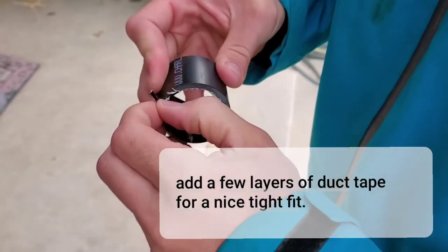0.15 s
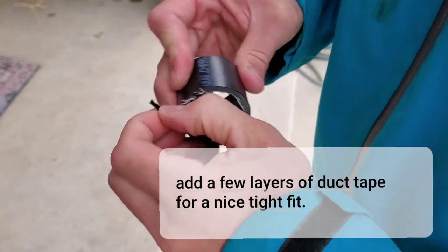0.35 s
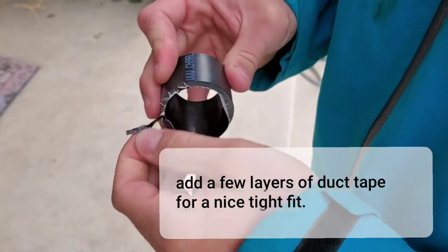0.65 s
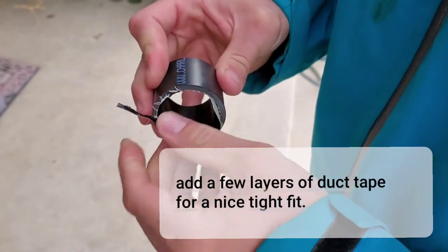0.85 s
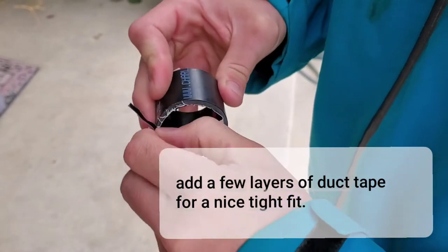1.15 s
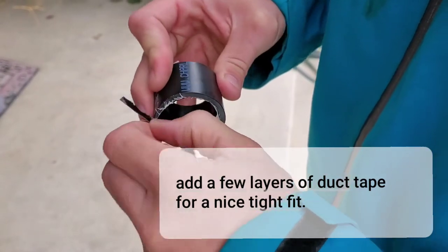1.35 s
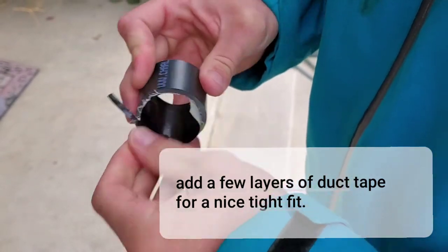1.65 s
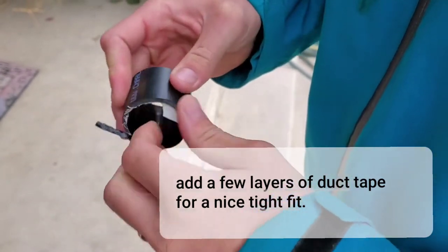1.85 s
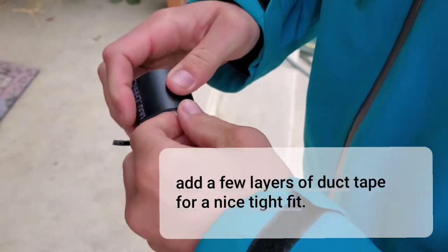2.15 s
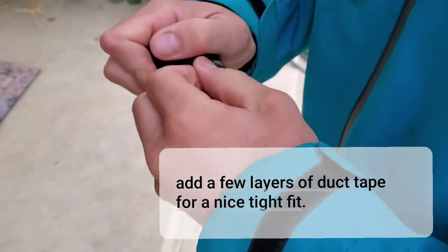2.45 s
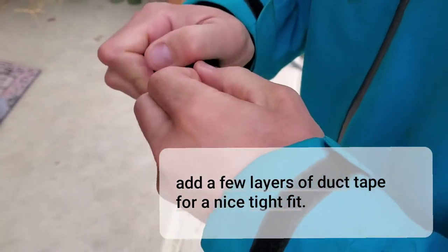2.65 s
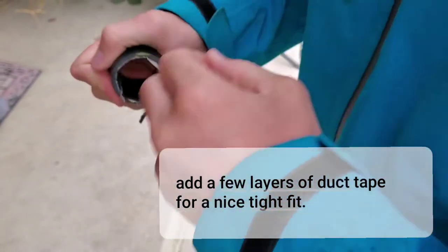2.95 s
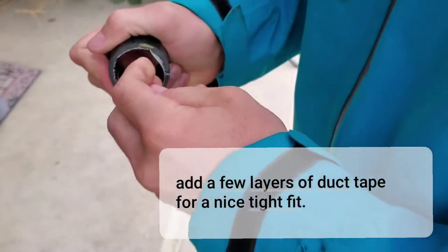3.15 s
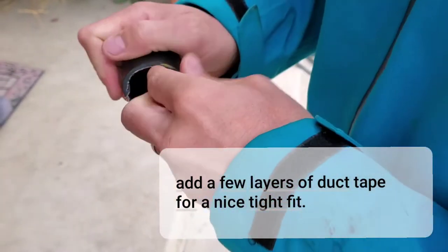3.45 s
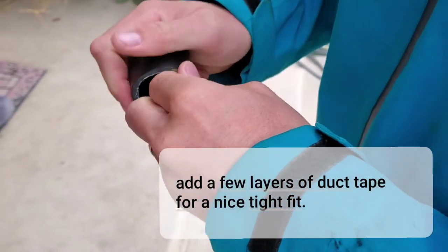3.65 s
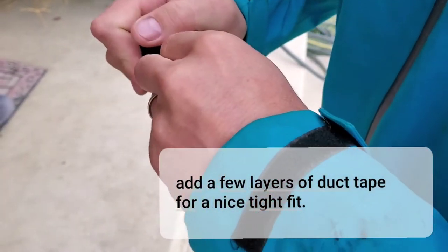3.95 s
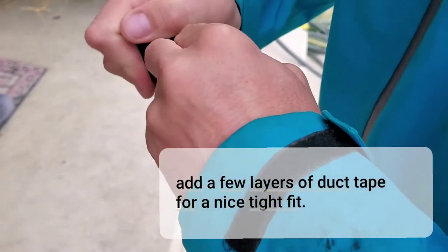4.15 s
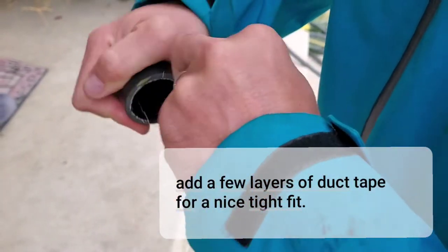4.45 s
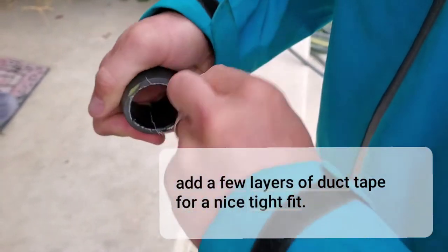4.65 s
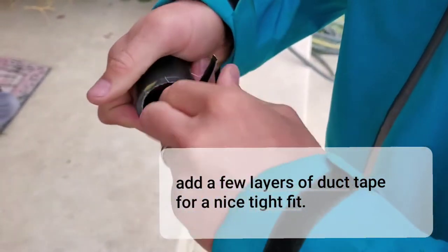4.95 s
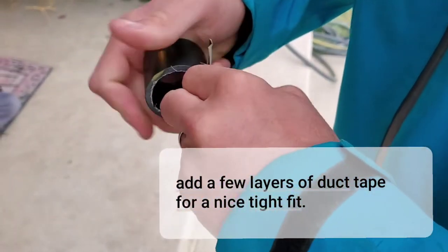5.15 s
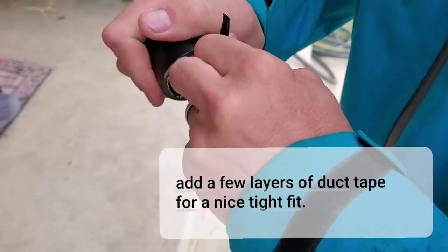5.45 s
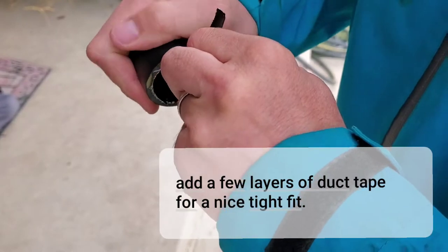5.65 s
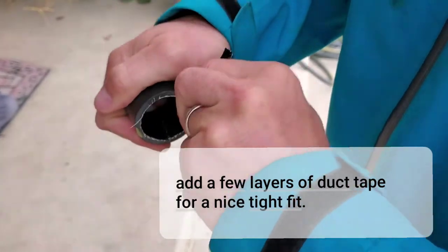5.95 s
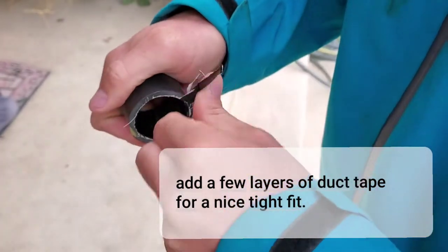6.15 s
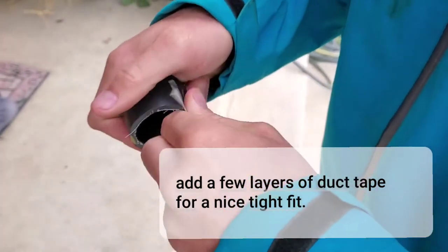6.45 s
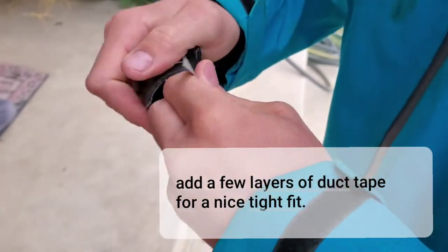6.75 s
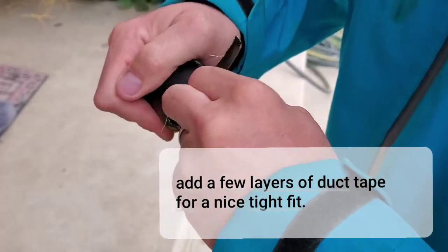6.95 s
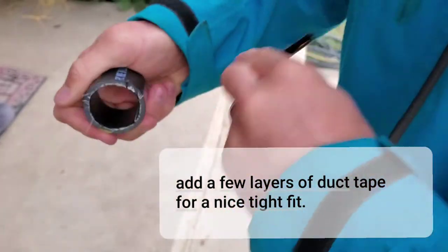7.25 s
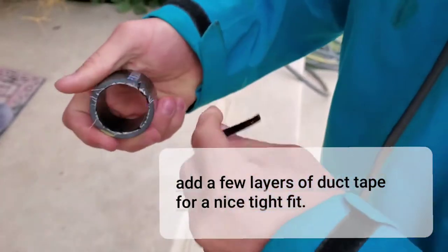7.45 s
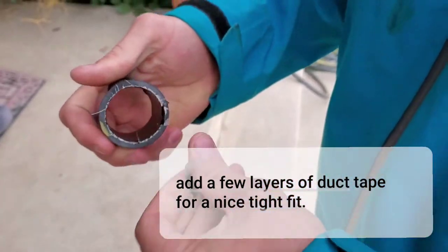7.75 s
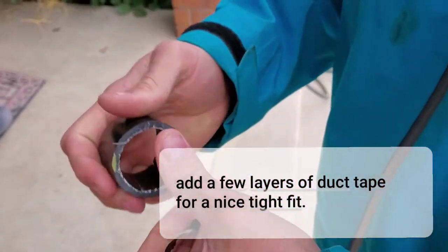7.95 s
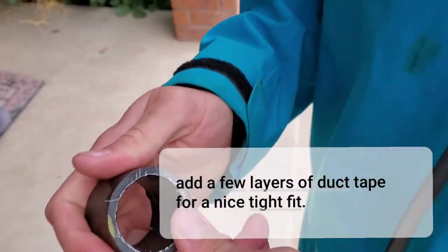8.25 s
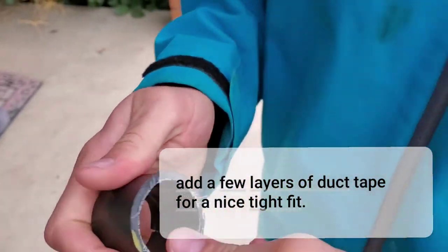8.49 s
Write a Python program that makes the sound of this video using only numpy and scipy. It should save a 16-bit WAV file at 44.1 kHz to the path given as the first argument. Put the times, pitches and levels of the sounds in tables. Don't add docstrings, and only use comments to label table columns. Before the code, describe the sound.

Sticky tape peels off a short plastic pipe in crackling snaps, then hands rub in even strokes; heavy booming thuds over distant motor drone.

```python
import sys
import numpy as np
from scipy import signal
from scipy.io import wavfile
from scipy.ndimage import uniform_filter1d

SR = 44100
rng = np.random.default_rng(int(sys.argv[2]) if len(sys.argv) > 2 else 0)


def materialize(psi):
    bounded = np.clip(np.atleast_2d(psi).T, -1, 1)
    quanta = np.round(bounded * 32767).astype(np.int16)
    wavfile.write(sys.argv[1], SR, quanta)


def magnitude_from_level(level_db):
    exponent = np.asarray(level_db, float) / 20
    return 10 ** exponent


N = 380141


def rms_one(x):
    return x / np.sqrt(np.mean(x ** 2) + 1e-20)


def in_time(rows):
    s, *columns = np.transpose(rows)
    return [np.interp(np.arange(N) / SR, s, column) for column in columns]


def at_hz(points, hz):
    points_hz, value = np.transpose(points)
    return np.interp(np.log(hz), np.log(points_hz), value)


def drift(rate_hz):
    r = np.exp(-80 * np.pi * rate_hz / SR)
    slow = signal.lfilter([1], [1, -2 * r, r * r], rng.standard_normal(N // 40 + 2002))[2000:]
    return np.interp(np.arange(N) / 40, np.arange(len(slow)), rms_one(slow))


def resonate(x, hz, width_hz):
    r = np.exp(-np.pi * width_hz / SR)
    zeros = [(1 - r * r) / 2, 0, (r * r - 1) / 2]
    poles = [1, -2 * r * np.cos(2 * np.pi * hz / SR), r * r]
    return signal.lfilter(zeros, poles, x + 1e-18)


def bands(x, span_hz):
    edges_hz = 28 * 2 ** np.arange(0, 9.6, .5)
    for k, (low, high) in enumerate(zip(edges_hz, edges_hz[1:])):
        if span_hz[0] < low < span_hz[1]:
            sos = signal.butter(2, [low, high], "band", fs=SR, output="sos")
            yield np.sqrt(low * high), signal.sosfilt(sos, x[k % len(x)])


def swells(rows):
    sag_db_per_s = 2.5
    time = np.arange(0, N, 44) / SR
    s, held, db, rise, fall = np.transpose(rows)[:, :, None]
    level_db = db - rise * np.maximum(s - time, 0)
    level_db = level_db - sag_db_per_s * np.clip(time - s, 0, held)
    level_db = level_db - fall * np.maximum(time - s - held, 0)
    return np.interp(np.arange(N) / SR, time, magnitude_from_level(2 * level_db).sum(axis=0))


# (frequency [Hz], likeness [-1..1])
FAR_LIKENESS = [(60, .99), (150, .996), (290, .98), (400, .95), (520, .75), (700, .5), (1400, .3),
                (3000, .05)]
FAR_LAG_SAMPLES = -14


def far(pair, hz):
    alike = np.clip(at_hz(FAR_LIKENESS, hz), -1, 1)
    left, right = np.sqrt(1 + alike) * pair[0] + np.sqrt(1 - alike) * pair[1] * [[1], [-1]]
    return np.array([np.roll(left, FAR_LAG_SAMPLES * (hz > 330)), right])


def near(direct, scattered, alike):
    lag_samples = 18
    right = alike * np.roll(direct, lag_samples) + np.sqrt(1 - alike ** 2) * scattered
    return np.array([direct, right])


# (frequency [Hz], level [dB])
HUSH_COLOUR = [(30, 1.5), (55, 2.5), (100, 4.5), (150, 2.5), (250, -6.5), (430, -11.5), (800, -18),
               (1200, -27), (1700, -29), (2400, -64)]


def hush():
    out = 0
    for hz, pair in bands(rng.standard_normal((2, 2, N)), span_hz=(0, 2400)):
        out = out + magnitude_from_level(at_hz(HUSH_COLOUR, hz) + 1.5 * drift(4)) * far(pair, hz)
    return magnitude_from_level(-49.5) * rms_one(out)


# (time [s], level [dB], upper tone against lower [dB])
MOTORS = [(0, -45.5, -8.5), (.84, -45, -6), (1.5, -44.5, -10), (2.5, -45.5, -5.5), (3.0, -41, -6),
          (3.8, -45.5, -7), (4.35, -49, -28), (4.7, -42.5, 8.5), (5.76, -42.5, -7), (6.19, -43.5, -7),
          (6.84, -41, -1.5), (8.33, -40, -3.5), (8.62, -43, -6.5)]
# (time [s], pitch [Hz])
UPPER_TONE = [
    (0, 133.1),
    (1.8, 141.5),
    (2.2, 125),
    (5, 120.1),
    (6, 115),
    (8.62, 109.2),
]
# (full from [s], held [s], level [dB], rise [dB/s], fall [dB/s])
BOOMS = [(0, .002, -31, 298, 244), (1.01, .002, -46, 130, 268), (1.13, .002, -36.5, 487, 307),
         (1.82, 0.025, -21, 1586, 193), (1.91, 0.035, -29.5, 300, 148), (2.06, .002, -34, 450, 94),
         (2.57, .2, -41.5, 132, 60), (2.95, 0.063, -31.5, 163, 207.5), (3.245, 0.024, -18.5, 698, 600),
         (3.17, 0.067, -30, 306, 302), (3.3, 0.06, -27.5, 300, 293), (3.44, 0.019, -16.5, 400, 200),
         (3.53, 0.13, -26, 195, 188), (3.82, 0.0017, -40.5, 72, 562), (4.13, 0.0022, -27.5, 300, 142),
         (4.39, .002, -41.5, 280, 110), (4.93, 0.083, -19, 450, 300), (5.05, 0.017, -33, 300, 200),
         (5.12, 0.059, -27, 102, 90), (6.24, .002, -39, 124, 450)]


def rumble():
    motor_db, upper_db = in_time(MOTORS)
    level_db = 10 * np.log10(magnitude_from_level(2 * motor_db) + swells(BOOMS))
    low_hz = 84.7 + .8 * drift(3)
    high_hz = in_time(UPPER_TONE)[0] + 1.5 * drift(3)
    low, high = (np.sin(2 * np.pi * np.cumsum(hz) / SR) * magnitude_from_level(2.0 * drift(3.3)) for hz in (low_hz, high_hz))
    tones = (low + magnitude_from_level(upper_db) * high) / np.sqrt(.5 + magnitude_from_level(2 * upper_db) / 2)
    low_band = signal.butter(4, [61, 110], "band", fs=SR, output="sos")
    boom = signal.sosfilt(low_band, rng.standard_normal((2, N)))
    boom, apart = boom / np.sqrt(uniform_filter1d(boom ** 2, size=2200) + 1e-9)
    share = np.clip(0.35 + (level_db + 38) / 12, .3, 1)
    mix = np.sqrt(1 - share) * tones + np.sqrt(share) * boom
    return magnitude_from_level(level_db) * (mix + magnitude_from_level(-27) * apart * [[1], [-1]])


# (time [s], peak [dB], brightness [dB/octave], t60 [s])
THUDS = [(0.732, -37, 2, 0.29), (1.103, -55, -23, 0.53), (1.813, -12, 2, 0.27), (2.64, -32, 0.5, 0.43),
         (2.782, -35, 7.5, 0.4), (2.93, -27, -1, 1), (3.229, -14.5, 2.5, 0.22), (3.237, -9.5, 0.5, 0.22),
         (3.408, -18, -1.5, 0.54), (4.11, -46, 5, 0.71), (4.876, -31.5, 5.5, 0.15), (4.888, -24.5, 3, 1),
         (5.147, -26.5, 2.5, 0.14), (5.19, -36, -5, 0.23), (1.837, -20.5, -4, 0.22), (4.93, -30, -5, .5),
         (3.437, -28, 2.5, 0.58)]
# (frequency [Hz], level [dB per Hz])
THUD_COLOUR = [(190, -1), (260, -4.5), (400, -12.5), (640, -19.5), (1000, -22), (2000, -32), (4000, -41.5),
               (8000, -60.5)]
# (frequency [Hz], level [dB], t60 [s])
PANEL = [(98, 4.5, 0.3), (180.7, 6, 0.21), (397, -2, 0.11), (493, 0.5, 0.14), (604, -1.5, 0.1),
         (730, -8, 0.23), (958, -11.5, 0.31)]
# (frequency [Hz], level against left [dB])
RIGHT_PORT = [(200, 6), (700, -2.5), (1300, -4), (2400, -5.5), (4400, -5.5), (8000, -2), (12000, 0),
              (15000, -8)]


def panel_modes(age):
    out = 0
    onset = (1 - np.exp(-age / 0.00043)) ** 2
    for hz, db, t60 in PANEL:
        lag_s = np.array([[FAR_LAG_SAMPLES * (hz > 330)], [0]]) / SR
        out = out + magnitude_from_level(db - 60 * age / t60) * np.sin(2 * np.pi * hz * (age - lag_s)) * onset
    return out


def thuds():
    age = np.arange(SR * 3 // 4) / SR
    out = np.zeros((2, N))
    echo = magnitude_from_level(-10.0 - 60 * age / 0.97)
    for hz, pair in bands(rng.standard_normal((2, 2, N)), span_hz=(130, 9000)):
        swell = np.zeros(N)
        onset = (1 - np.exp(-age / 0.002)) ** ((hz / 250) ** 0.13)
        for s, peak_db, bright_db, t60 in THUDS:
            decay = magnitude_from_level(-60 * age / t60 * (hz / 300) ** 0.068) + echo
            gain = magnitude_from_level(peak_db + 6 + at_hz(THUD_COLOUR, hz) + bright_db * np.log2(hz / 250))
            swell[round(s * SR):][:len(age)] += gain * decay * onset
        out += swell * far(pair, hz) * magnitude_from_level([[0], [0.23 * at_hz(RIGHT_PORT, hz)]])
    for which, share_db in (7, -9.5), (8, -8.0):
        s, peak_db = THUDS[which][:2]
        out[:, round(s * SR):][:, :len(age)] -= magnitude_from_level(peak_db + share_db) * panel_modes(age)
    return out


# (time [s], pitch [Hz], level [dB])
MOANS = [
    [(6.78, 265.0, -70), (6.856, 330.4, -39.5), (6.936, 353, -49), (6.974, 334, -39.5), (7.02, 308, -50)],
    [(7.9, 234, -51), (8.016, 218, -47.5), (8.04, 200, -64)],
    [(8.3, 1110, -62), (8.342, 1180, -49), (8.37, 1224, -58), (8.4, 1192, -48), (8.42, 1090, -58)],
]
# (time [s], length [s], pitch [Hz], width [Hz], level [dB])
NOTES = [(2.228, 0.07, 860, 200, -61), (2.228, 0.035, 2060, 400, -66), (2.26, 0.14, 2060, 460, -73),
         (1.9, 0.06, 2320, 450, -63), (2.0, 0.067, 730, 130, -57), (1.814, .04, 3000, 1500, -44.5),
         (2.76, 0.013, 1670, 290, -35.5), (2.796, 0.0082, 1300, 500, -42), (3.228, .016, 1630, 300, -37),
         (3.263, 0.012, 1830, 500, -38), (3.48, 0.019, 1650, 200, -47), (5.148, 0.081, 480, 260, -48),
         (4.9, .05, 570, 250, -51), (5.01, .11, 2400, 340, -59.5), (2.63, .06, 1700, 710, -65.5),
         (7.52, 0.25, 450, 180, -56), (7.58, .09, 900, 280, -53.5), (8.01, 0.11, 810, 600, -55),
         (8.24, 0.11, 1800, 550, -45), (8.3, 0.034, 520, 80, -53), (8.52, .08, 260, 360, -51.5),
         (2.63, 0.055, 213, 75, -33.5), (0.82, 0.032, 187, 55, -50.5), (3.885, 0.27, 3640, 1500, -67.5),
         (1.817, 0.043, 194, 67, -21.5), (3.243, 0.045, 1580, 220, -46), (3.417, 0.1, 1630, 240, -56),
         (5.83, 0.066, 960, 200, -55.5), (5.809, 0.088, 302, 67, -51), (6.132, 0.12, 295, 50, -53),
         (6.603, 0.064, 910, 120, -60), (7.16, 0.22, 480, 83, -51), (7.28, 0.094, 188, 37, -46.5),
         (8.2, .12, 890, 350, -52.5), (7.325, 0.12, 322, 38, -51.5), (7.942, 0.049, 517, 51, -54),
         (8.027, 0.108, 426, 17, -52), (8.046, 0.12, 326, 21, -48.5), (8.06, 0.076, 212, 38, -45.5),
         (8.24, 0.094, 466, 60, -50)]


def moans():
    out, time = np.zeros(N), np.arange(N) / SR
    for rows in MOANS:
        hz, level_db = in_time(rows)
        fade = np.clip(np.minimum(time - rows[0][0], rows[-1][0] - time) / 0.019, 0, 1)
        tone = np.sqrt(2) * np.sin(2 * np.pi * np.cumsum(hz) / SR)
        out += magnitude_from_level(level_db + 2.0 * drift(89)) * fade * tone
    for s, length_s, hz, width_hz, db in NOTES:
        count = round(length_s * SR)
        note = resonate(rng.standard_normal(SR // 2), hz, width_hz)
        note = resonate(note, hz, width_hz)[-count:]
        out[round(s * SR):][:count] += magnitude_from_level(db) * rms_one(note * np.hanning(count) ** .5)
    return out


# (full speed from [s], held [s], level [dB], rise [dB/s], fall [dB/s])
STROKES = [(5.27, 0.12, -31.5, 310, 261), (5.79, 0.028, -38, 174, 192), (6.018, 0.19, -33.5, 900, 304),
           (6.46, 0.14, -49.5, 207, 250), (6.52, 0.011, -39, 160, 130), (6.82, 0.12, -32, 327, 228),
           (7.28, 0.032, -35, 77, 178), (7.55, 0.15, -33.5, 152, 163), (8.02, 0.015, -32.5, 130, 181),
           (8.245, 0.046, -30.5, 497, 74), (8.41, 0.019, -32.5, 111, 251), (7.6, 0.009, -43, 500, 300),
           (8.19, .03, -42, 400, 100)]
# (full from [s], held [s], level [dB], rise [dB/s], fall [dB/s])
PEELS = [
    (.43, 0.0033, -38, 900, 430),
    (2.365, 0.039, -55, 900, 500),
    (2.748, 0.017, -24.5, 860, 900),
    (2.775, 0.049, -35, 900, 233),
    (4.36, 0.027, -39.5, 262, 241),
    (4.5, 0.0032, -48, 190, 129),
]
# (full from [s], held [s], level [dB], rise [dB/s], fall [dB/s])
BRUSHES = [(0, 0.0036, -50, 200, 600), (.05, 0.12, -56.5, 260, 100), (.23, 0.036, -48, 360, 350),
           (1.0, 0.022, -57.5, 110, 170), (2.02, 0.013, -53.5, 170, 65), (.48, 0.025, -55, 61, 52),
           (.73, 0.04, -55, 1500, 200), (.79, 0.063, -55, 400, 500), (1.7, 0.17, -57, 16.6, 98),
           (3.3, 0.063, -53.5, 200, 60), (3.6, 0.1, -55, 21, 33), (4.1, 0.032, -59.5, 17, 61),
           (4.72, 0.022, -55.5, 160, 68), (4.91, 0.11, -46.5, 270, 59), (5.55, 0.056, -52, 170, 100),
           (7.05, 0.053, -48.5, 180, 81), (8.52, 0.16, -69, 110, 60), (.905, 0.033, -63, 540, 200),
           (1.108, 0.024, -65.5, 900, 300), (6.31, 0.03, -57.5, 180, 150)]
# (full from [s], held [s], level [dB], rise [dB/s], fall [dB/s])
SHAKES = [
    (1.28, 0.051, -58, 403, 300),
    (1.82, .005, -43, 900, 106),
    (3.26, .005, -46.5, 92, 96),
    (3.45, 0.027, -51, 200, 59.6),
]


def friction():
    rest_db = -66.5
    powers = [swells(STROKES), swells(PEELS), swells(BRUSHES), swells(SHAKES), magnitude_from_level(2 * rest_db)]
    brights_db = -4.5, -2, -2, -11.5, -4.5
    total = sum(powers)
    return 10 * np.log10(total), sum(p * b for p, b in zip(powers, brights_db)) / total


# (frequency [Hz], level [dB per Hz])
RUB_COLOUR = [(150, 0), (300, -3.5), (550, -8.5), (900, -2.5), (1600, -1.5), (2800, 0.5), (4600, 2),
              (8000, -7), (12000, -9.5), (15000, -4.5)]
# (frequency [Hz], level [dB])
SOFT_TOUCH = [(1200, 8.5), (2200, -4.5), (4000, -2), (8000, 1), (12000, 0.5), (17000, 0)]
# (frequency [Hz], likeness [0..1])
NEAR_LIKENESS = [(300, .8), (600, .45), (1400, .7), (2800, .3), (6000, .27), (11000, .15)]
# (frequency [Hz], width [Hz], level [dB])
BOARD = [(495, 64, 6.5), (1700, 170, -10), (2920, 980, -1.5), (3500, 210, -8), (4470, 59, -8.5)]
# (delay [s], level [dB])
ECHOES = [
    (.0031, -55),
    (.0074, -14),
]


def rub():
    level_db, bright_db = friction()
    grains = rng.standard_normal((2, 2, N)) * magnitude_from_level(2.5 * rng.standard_normal((2, 1, N)))
    out, together = 0, drift(27)
    light = np.clip((-34.5 - level_db) / 12, 0, 1)
    faint = np.clip((-50.5 - level_db) / 12, 0, 1)
    for hz, pair in bands(grains, span_hz=(130, SR)):
        tilt = np.clip(np.log2(hz / 5000), -1.5, 1.5)
        gain_db = at_hz(RUB_COLOUR, hz) + 0.94 * (bright_db + 5.5) * tilt
        gain_db = gain_db + light * at_hz(SOFT_TOUCH, hz)
        flicker_db = 0.5 * together + 2.0 * drift(29)
        both = near(*pair, at_hz(NEAR_LIKENESS, hz) * (1 - faint))
        out = out + magnitude_from_level(gain_db + flicker_db) * both * magnitude_from_level([[0], [at_hz(RIGHT_PORT, hz)]])
    out = out - faint * (.85 * resonate(out, 13800, 4100) + .5 * resonate(out, 2540, 980))
    out = out + sum(magnitude_from_level(db) * resonate(out, hz, width_hz) for hz, width_hz, db in BOARD)
    out = out + sum(magnitude_from_level(db) * np.roll(out, round(s * SR), axis=1) for s, db in ECHOES)
    return magnitude_from_level(level_db) * out / np.sqrt(np.mean(out[0] ** 2))


# (time [s], peak [dB])
SNAPS = [(0.4033, -31.5), (0.4135, -26.0), (0.4155, -23.5), (0.4249, -20.5), (0.431, -23.5),
         (0.4402, -23.0), (0.7799, -29.5), (2.361, -22.5), (2.3669, -37.5), (2.6993, -20.5),
         (2.7126, -24.5), (2.7195, -25.0), (2.7235, -25.5), (2.732, -19.5), (2.7355, -19.5),
         (2.7401, -16.0), (2.7425, -16.5), (2.7457, -13.5), (2.753, -12.0), (2.7564, -13.0),
         (2.7611, -17.0), (2.7643, -14.0), (2.7665, -16.0), (2.768, -11.5)]
# (time [s], peak [dB])
RUN = [(4.2894, -27.0), (4.2915, -29.5), (4.3184, -25.0), (4.3258, -23.5), (4.3295, -23.0), (4.3398, -22.0),
       (4.3427, -20.5), (4.348, -20.5), (4.3522, -20.5), (4.3593, -22.5), (4.3659, -25.5), (4.3709, -25.5),
       (4.3752, -22.0), (4.3805, -18.5), (4.3838, -15.5), (4.387, -16.5), (4.392, -17.5), (4.4051, -19.5),
       (4.4218, -21.0), (4.426, -26.5), (4.4774, -30.0), (4.4815, -20.5), (4.4869, -38.0), (4.4963, -21.0),
       (4.5015, -37.0), (4.5142, -18.0), (4.5435, -19.5)]
# (time [s], peak [dB])
TICKS = [(5.7013, -19.5), (5.7036, -28.5), (5.7312, -20.5), (5.7455, -25.5), (5.7577, -25.0), (5.76, -21.0),
         (5.7675, -19.0), (5.7762, -20.0), (5.788, -20.0), (5.7949, -21.5), (5.8027, -16.0),
         (5.8061, -20.0), (5.8096, -16.5), (5.8199, -25.0), (5.828, -16.5), (6.314, -41.0), (6.327, -45.0),
         (7.019, -19.0), (7.0281, -21.0), (7.0325, -26.5), (7.041, -19.5), (7.0956, -12.0), (7.0989, -11.5)]
# (time [s], peak [dB])
EXTRA_SNAPS = [(2.749, -27), (2.7583, -14), (2.236, -50), (5.935, -45), (7.0828, -32), (7.0939, -9.5),
               (7.101, -23), (7.596, -33), (7.605, -26.5), (8.075, -36), (8.131, -40), (8.141, -44),
               (8.24, -33), (8.253, -26), (8.422, -34), (8.481, -39.5), (8.61, -36)]
# (from [s], first ring [Hz], second ring [Hz], pipe body [dB], brightness [dB/octave])
PULLS = [(0, 10000, 7000, -14, 0), (.7, 5600, 4500, -17, -4), (2.3, 4000, 6800, -30, -2),
         (2.6, 6440, 3780, -30, -3), (2.744, 6800, 3970, -17.5, -3.5), (4.2, 6800, 4500, -25, 1),
         (4.45, 6800, 5300, -31, -1), (5.6, 6800, 4450, -28, 4), (6.9, 9700, 3800, -20.5, 5),
         (7.062, 9400, 3770, -29, 3), (7.5, 3000, 1920, -4, -22), (8.55, 8500, 6800, -32, -2)]
# (frequency [Hz], width [Hz], level [dB])
TAPE = [(2355, 230, -13), (3550, 320, -7), (5840, 730, -9.5), (6800, 390, -3.5), (8100, 72, -15),
        (10560, 6200, 4), (11270, 5300, 1), (14200, 980, -5)]


def tape_ring(burst, rings_hz, bright_db):
    tone = magnitude_from_level(-10) * resonate(burst, 8000, 9000)
    chance = rng.standard_normal(len(TAPE))
    for k, (hz, width_hz, db) in enumerate(TAPE):
        gain = magnitude_from_level(db + 2.0 * chance[k] + bright_db * np.log2(hz / 7000))
        tone += (-1) ** k * gain * resonate(burst, hz, width_hz)
    for hz in rings_hz:
        tone += magnitude_from_level(bright_db * np.log2(hz / 7000) - 1.5) * resonate(burst, hz, hz / 7)
    return tone


def snaps():
    body_hz, body_width_hz = 1570, 750
    age = np.arange(round(.045 * SR)) / SR
    out = np.zeros((2, N + len(age)))
    crack = np.exp(-age / .0004) + magnitude_from_level(-17.5) * np.exp(-age / 0.0084)
    for s, peak_db in SNAPS + RUN + TICKS + EXTRA_SNAPS:
        _, first_hz, second_hz, body_db, bright_db = [pull for pull in PULLS if pull[0] <= s][-1]
        burst = rng.standard_normal((2, len(age))) * crack
        burst[:, 0] = 3.5
        tone = tape_ring(burst, (first_hz, second_hz), bright_db)
        loudest = np.sqrt(2 * uniform_filter1d(tone ** 2, size=22).max(axis=1, keepdims=True))
        body = resonate(resonate(burst, body_hz, body_width_hz), body_hz, body_width_hz)
        body = body / np.abs(body).max(axis=1, keepdims=True)
        at = round(s * SR)
        out[:, at:at + len(age)] += magnitude_from_level(peak_db + 3.5) * (tone / loudest + magnitude_from_level(body_db) * body)
    both = near(*out[:, :N], alike=.45)
    both[1] = resonate(both[1], 7300, 12000)
    return both * magnitude_from_level([[0], [-5.5]])


def scene():
    hands = snaps() + rub()
    shade = signal.butter(3, 12440, fs=SR, output="sos")
    hands[1] = signal.sosfilt(shade, hands[1])
    return hush() + rumble() + thuds() + moans() + hands


CUTOFF_HZ, TOP_HZ = 14600, 15800


def top_band(dry):
    open_db, open_s = 7, .003
    band = signal.ellip(5, .5, 55, [CUTOFF_HZ, TOP_HZ], "band", fs=SR, output="sos")
    power = (np.diff(dry, axis=1, prepend=0) ** 2).sum(axis=0)
    jump = uniform_filter1d(power, size=40) > magnitude_from_level(2 * open_db) * uniform_filter1d(power, size=1500)
    gate = np.clip(uniform_filter1d(jump * 20., size=round(open_s * SR)), 0, 1)
    return magnitude_from_level(-13) * signal.sosfilt(band, dry) * gate


def band_limit(x):
    return signal.sosfilt(signal.butter(12, 15920, fs=SR, output="sos"), x)


# (frequency [Hz], width [Hz], depth [0..1])
PORT_DIPS = [(2140, 390, 0.07), (7600, 610, 0.34)]


def record(dry):
    dry = signal.sosfilt(signal.butter(2, 38, "high", fs=SR, output="sos"), dry)
    for hz, width_hz, depth in PORT_DIPS:
        dry = dry - depth * resonate(dry, hz, width_hz)
    low_pass = signal.ellip(10, .5, 55, CUTOFF_HZ, fs=SR, output="sos")
    mix = top_band(dry) + signal.sosfilt(low_pass, dry)
    return band_limit(mix)


dry = scene()
out = record(dry)
materialize(out)
```